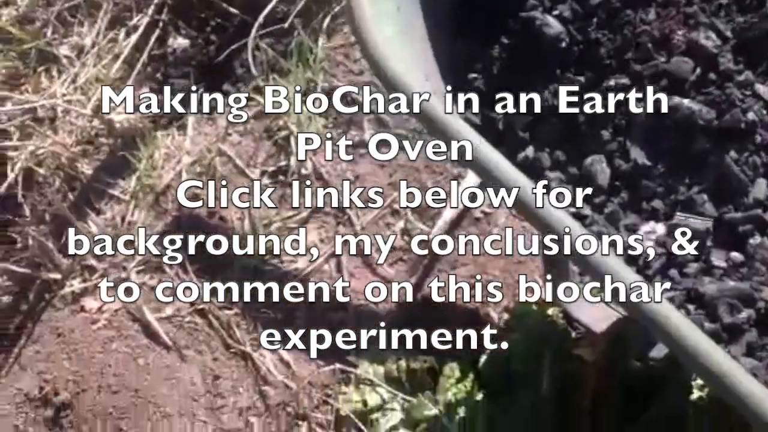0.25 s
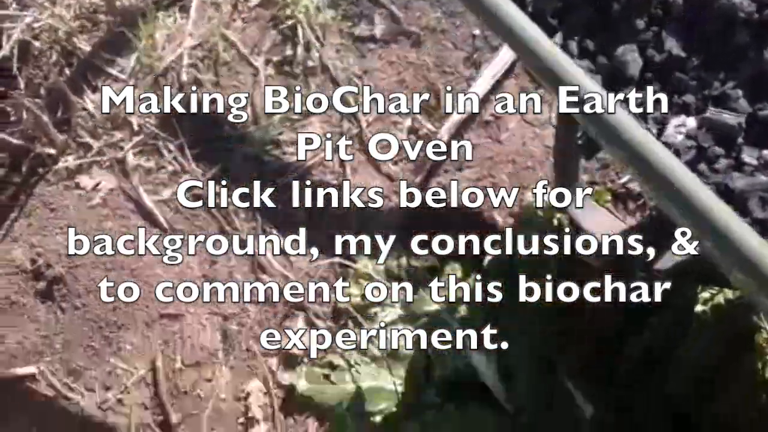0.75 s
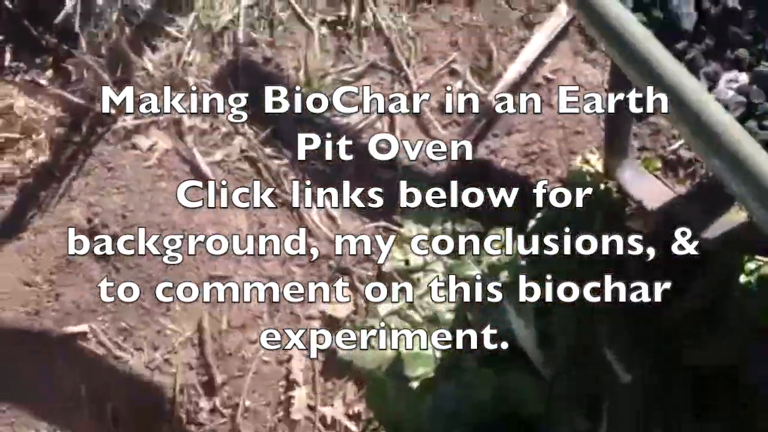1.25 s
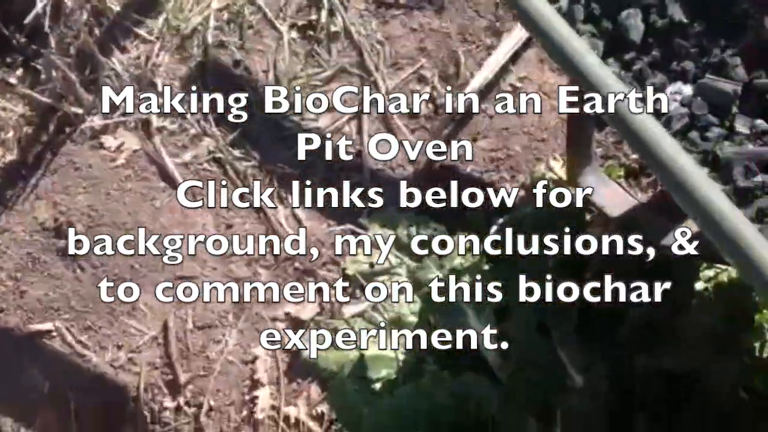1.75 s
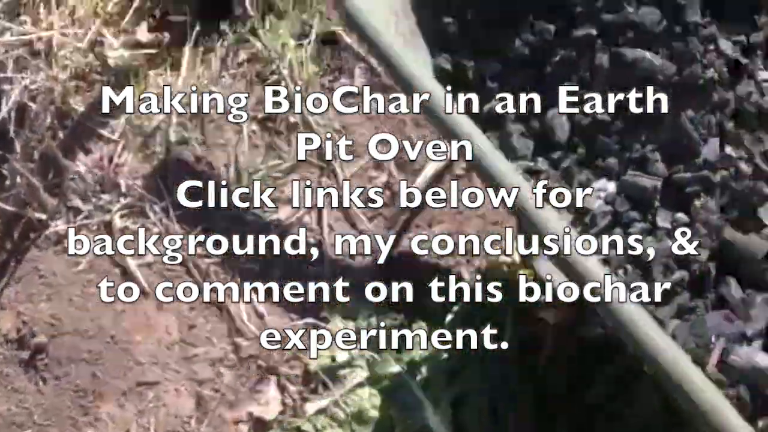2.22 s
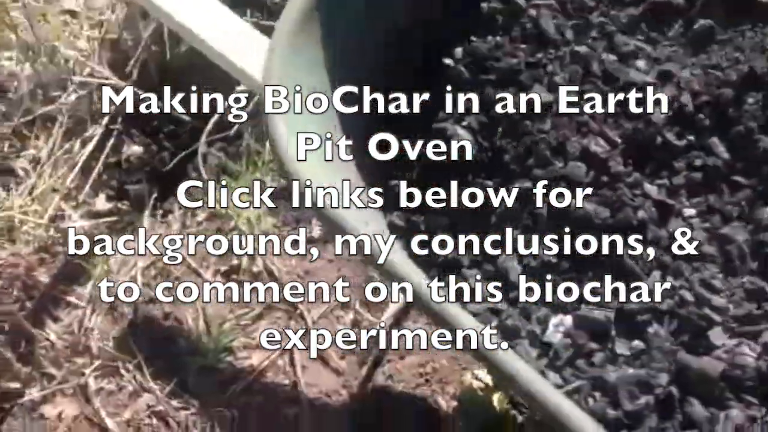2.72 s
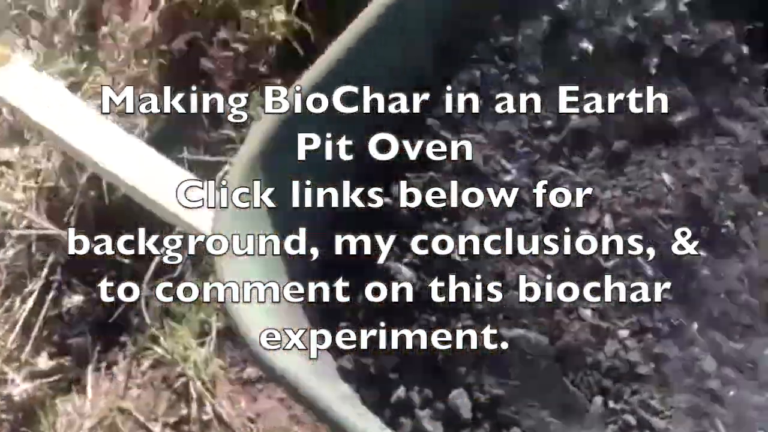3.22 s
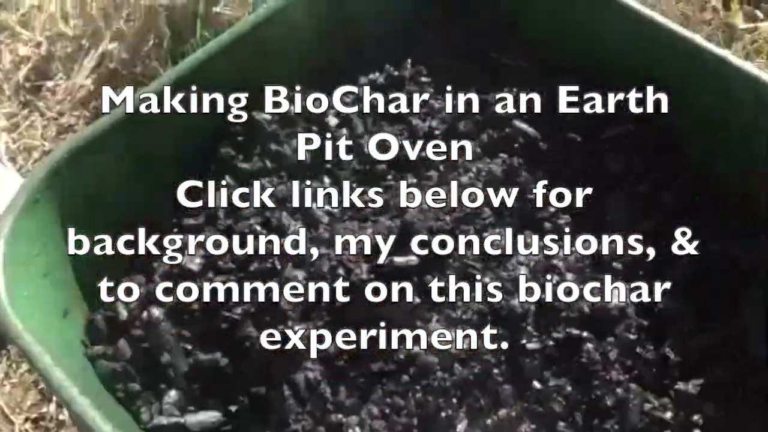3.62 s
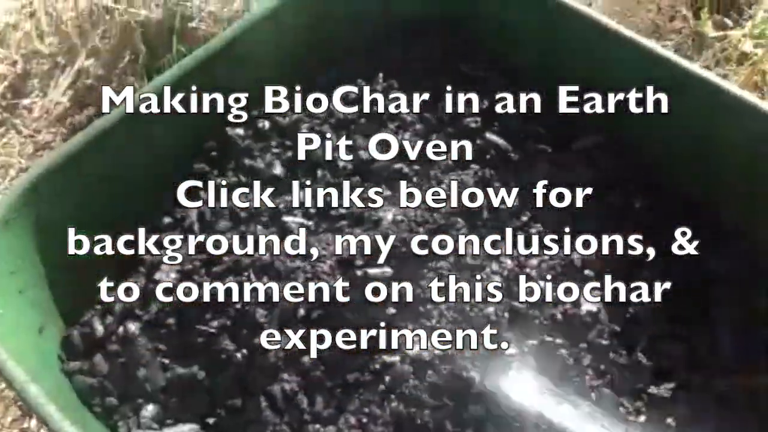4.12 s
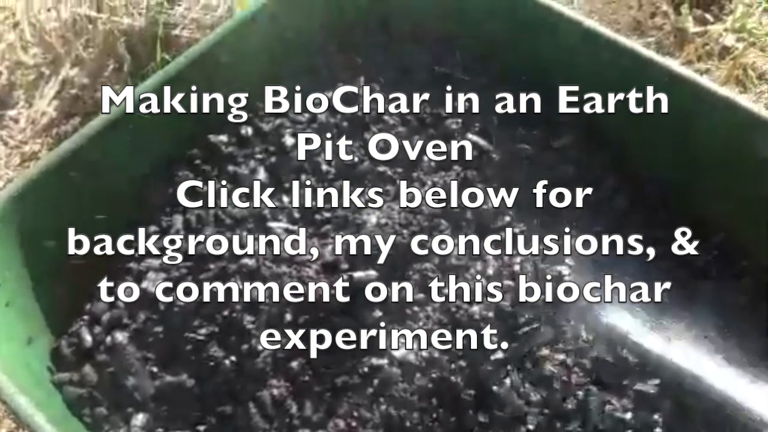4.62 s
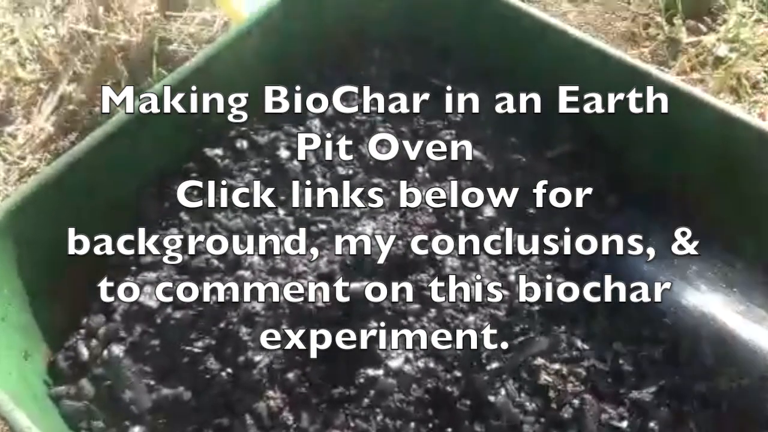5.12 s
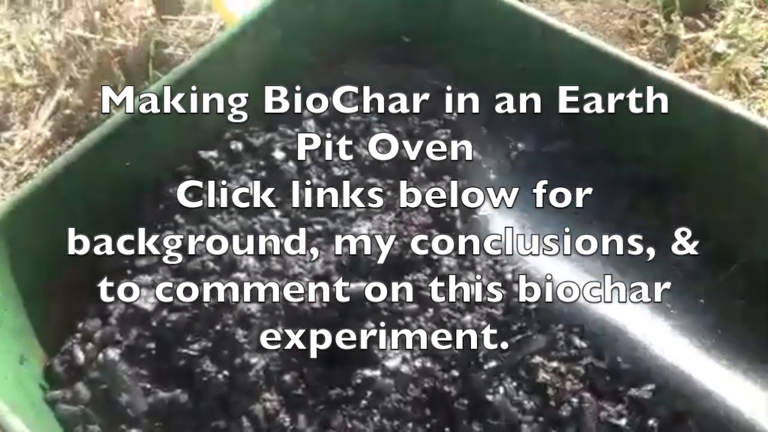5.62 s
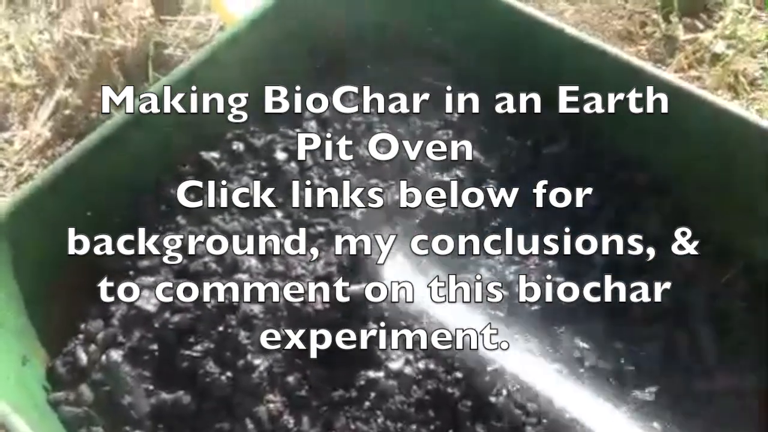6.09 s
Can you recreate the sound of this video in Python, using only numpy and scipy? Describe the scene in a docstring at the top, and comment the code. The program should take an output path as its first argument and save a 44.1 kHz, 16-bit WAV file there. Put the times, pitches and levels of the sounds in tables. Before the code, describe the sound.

After a quiet moment, a hose snaps on and hisses steadily, spattering soil and charcoal, with one sharp rattling rap and late wind thumps.

```python
"""Garden hose on a barrow of charcoal

A hose opens in a quiet yard; its jet swings over the soil and onto a wheelbarrow of charcoal.
The nozzle hisses (noise combed by sliding reflections); random drops splash on the lumps and drum on the tub.
Once the jet raps sharply across the barrow's rim, a volley of impacts through narrow resonances.
Puffs of wind, low noise and short pushes, nudge the microphone, more towards the end."""
import sys
import numpy as np
from scipy import signal
from scipy.fft import rfft, irfft
from scipy.io import wavfile
from scipy.ndimage import uniform_filter1d

SR = 44100
rng = np.random.default_rng(int(sys.argv[2]) if len(sys.argv) > 2 else 0)


def transcribe(signal):
    """Save signal, clipped to [-1, 1], as a 16-bit WAV file at the path in sys.argv[1]."""
    frames = np.atleast_2d(signal).T
    limited = np.clip(frames, -1, 1)
    pcm = np.round(limited * 32767).astype(np.int16)
    wavfile.write(sys.argv[1], SR, pcm)


N = 280123
TIME = np.arange(N) / SR  # s
HZ = np.fft.rfftfreq(N, 1 / SR)  # bins of the whole take
FRAMES = np.arange(N // 128 + 5) * 128 / SR  # s, short-time frames
BINS = np.fft.rfftfreq(512, 1 / SR)  # Hz, short-time bins


def gain_of(db):
    """Decibels to amplitude."""
    return 10 ** (np.asarray(db) / 20)


def evened(x):
    """Scales to an rms of one."""
    return x / np.sqrt(np.mean(x ** 2) + 1e-20)


def read(points, hz):
    """A spectrum in dB, joined on a log-frequency axis."""
    f, db = np.transpose(points)
    return np.interp(np.log(hz + 1), np.log(f + 1), db)


def follow(rows, t):
    """Every column of a curve table at the times t."""
    s, *columns = np.transpose(rows)
    return [np.interp(t, s, c) for c in columns]


def coloured(x, colour):
    """Filters x by a spectrum; rms one."""
    spectrum = rfft(x) * gain_of(read(colour, HZ))
    return evened(irfft(spectrum, N))


def flutter(rate):
    """Smooth random wandering, up to about rate changes a second; rms one."""
    spectrum = rfft(rng.standard_normal(N)) * np.exp(-(HZ / rate) ** 2)
    return evened(irfft(spectrum, N))


def impacts(per_s, spread_db):
    """Random drop impacts of either sign: many small, a few large."""
    size = gain_of(spread_db * np.minimum(rng.exponential(1, N), 4))
    sign = rng.choice([-1, 1], N)
    lands = rng.random(N) < per_s / SR
    return size * sign * lands


def bell(x, centre, width):
    """One at the centre, falling smoothly to either side."""
    return np.exp(-.5 * ((x - centre) / width) ** 2)


def swell(s, db, half):
    """A bell-shaped envelope in time."""
    return gain_of(db) * bell(TIME, s, half)


def swells(rows):
    """Overlapping bells, summed in power."""
    return np.sqrt(sum(swell(*row) ** 2 for row in rows))


def patches(frames, bins):
    """Random time-frequency patches of unit spread."""
    field = rng.standard_normal((len(FRAMES), len(BINS)))
    along_time = uniform_filter1d(field, round(frames), axis=0)
    return evened(uniform_filter1d(along_time, round(bins), axis=1))


def shaded(x, gains):
    """Filters x by gains that change from frame to frame."""
    z = signal.stft(x, nperseg=512, noverlap=384)[2]
    return signal.istft(z * gains[:z.shape[1]].T, nperseg=512, noverlap=384)[1][:N]


def yard():
    """Steady far-off outdoor murmur of air: noise under a fixed spectrum."""
    # murmur: (frequency [Hz], density [dB])
    yard_colour = [(20, -45), (45, -26), (85, -12.5), (130, -5.5), (200, -6), (290, -7), (420, -5.5),
                   (700, -7), (1000, -12.5), (1300, -17), (2100, -28), (4000, -31.5), (10000, -33.5),
                   (15000, -40)]
    return gain_of(-55.5) * coloured(rng.standard_normal(N), yard_colour)


def wind(lumpy_db=2.0, breeze_db=-1.5, buffet_db=1.0, low_cut_hz=58):
    """Eddies swell in gusts, brighter when strong, with short pushes; the microphone cuts the deepest part."""
    # gusts on the microphone, before breeze_db: (time [s], level [dB], bell half length [s])
    gusts = [(.4, -58, 0.071), (.95, -57, .17), (1.3, -56, .04), (3.75, -58, 0.16), (4.9, -54, 0.21),
             (5.33, -48.5, 0.086), (5.56, -40.5, 0.07), (5.97, -42, 0.13), (6.235, -30, 0.047)]
    # single buffets, before buffet_db: (time [s], level [dB])
    buffet_rows = [(.09, -50), (.196, -44.5), (.623, -44), (.712, -48.5), (.925, -50), (1.115, -47),
                   (4.79, -43.5), (4.971, -44), (5.31, -39.5), (5.505, -36), (5.63, -35), (5.7, -42),
                   (5.755, -45), (5.835, -36.5), (5.875, -35.5), (5.924, -33.5), (6.015, -33.5),
                   (6.053, -32.5), (6.147, -31.5), (6.199, -29)]
    # low rumble of the eddies: (frequency [Hz], density [dB])
    wind_colour = [(20, -44), (40, -24), (70, -18), (105, -2), (145, 0.5), (210, -0.5), (290, -9),
                   (400, -15), (700, -37), (2000, -68)]
    # higher roar of strong gusts: (frequency [Hz], density [dB])
    roar_colour = [(120, -37), (235, 3), (320, -4), (480, -19), (800, -36), (2000, -66)]
    calm_db = -74  # light air between the gusts, before breeze_db
    half_s, buffet_hz, spread_octaves = 0.0053, 174.6, .35  # each buffet is a push of about two swings
    roar_db, roar_from_db, roar_growth = -7.5, -31.5, 1.57  # share at that wind level; power of growth

    lumps_db = lumpy_db * flutter(27)
    breeze = np.hypot(gain_of(calm_db), swells(gusts)) * gain_of(breeze_db + lumps_db)
    pressure = breeze * coloured(rng.standard_normal(N), wind_colour)

    buffets = [swell(s, db + buffet_db, half_s) for s, db in buffet_rows]
    draws = rng.uniform(-1, 1, (len(buffets), 2))
    for push, (pitch, phase) in zip(buffets, draws):
        hz = buffet_hz * 2 ** (spread_octaves * pitch)
        pressure += push * np.sin(2 * np.pi * hz * TIME + np.pi * phase)

    force = np.hypot(breeze, sum(buffets)) / gain_of(roar_from_db)
    roar = gain_of(roar_from_db + roar_db) * force ** roar_growth
    pressure += roar * coloured(rng.standard_normal(N), roar_colour)
    low_cut = signal.butter(2, low_cut_hz, "high", fs=SR, output="sos")
    return signal.sosfilt(low_cut, pressure)


def rustle():
    """Soft bright scuffs and ticks of handling the hose: dense small impacts under short bells."""
    # faint rustles: (time [s], level [dB], bell half length [s])
    rustle_rows = [(.238, -69, .018), (.276, -61, .0008), (.57, -68.5, 0.087), (.61, -68, .001)]
    colour = [(500, -20), (1700, 2), (4000, 1), (8000, -1), (15000, -10)]  # (Hz, dB)
    return swells(rustle_rows) * coloured(impacts(6000, 3), colour)


def valve(rise=0.0017):
    """Zero until the valve snaps open, then one after a rise in seconds."""
    open_s = .711
    return np.clip((TIME - open_s) / rise + .5, 0, 1)


def landing():
    """Splash, drum and patter levels in dB: each holds on a spot and slides to the next."""
    # where the jet lands: ground (three rows), edge of the load, near the rim, then inside the tub;
    # (arrival [s], splash [dB], drumming of the surface [dB], patter on soil [dB]), before trims
    spots = np.array([ (.8, -49, -56, -71), (1.03, -47, -56.5, -78), (1.33, -48.5, -62, -61.5),
                      (2.25, -42.5, -54, -51), (3.04, -41, -48, -52), (3.35, -45.5, -49.5, -59.5),
                      (3.8, -44, -51, -59.5), (5.15, -43.5, -51, -54), ])
    swing_s = 0.09  # slide from one spot to the next
    first_spray_db = -12  # the first thin spray, against the first spot
    before = spots[0, 1:] + first_spray_db
    steps = np.diff(np.vstack([before, spots[:, 1:]]), axis=0)
    arrived = np.clip((TIME - spots[:, :1]) / swing_s + .5, 0, 1)
    return before[:, None] + steps.T @ arrived


def soil():
    """Dull patter of heavy drops on earth: random impacts under a low spectrum."""
    # thud of wet earth: (frequency [Hz], density [dB])
    soil_colour = [(50, -55), (95, -28), (150, -0.5), (230, 0.5), (330, -1.5), (470, -2), (700, -9.5),
                   (1400, -27), (4000, -53)]
    return gain_of(landing()[2]) * coloured(impacts(900, 1.64), soil_colour)


def splats():
    """Short slaps, thuds and whistles in the spray: bursts of noise, each gathered around one pitch."""
    # bursts: (time [s], level [dB], centre [Hz], width [octaves], bell half length [s])
    splat_rows = [(2.272, -44, 440, 0.7, 0.0075), (2.269, -38.5, 1540, 0.53, .002),
                  (2.878, -39, 383, 0.97, 0.006), (2.878, -40, 1000, 0.8, 0.0024),
                  (3.83, -51, 78, 0.3, 0.016), (3.94, -49.5, 930, 0.49, 0.11),
                  (4.508, -40.5, 1560, 0.25, 0.029), (5.0, -46, 9100, .04, 0.066),
                  (5.24, -48.5, 1320, 0.22, 0.073), (5.452, -42, 2400, 1, 0.064),
                  (5.904, -49.5, 900, 0.16, 0.026)]
    out = np.zeros(N)
    for s, db, centre_hz, octaves, half in splat_rows:
        hollow = bell(np.log2((HZ + 1) / centre_hz), 0, octaves)
        burst = irfft(rfft(rng.standard_normal(N)) * hollow, N)
        out += swell(s, db, half) * evened(burst)
    return out


def rap(trim_db=1.1):
    """A tight volley of hard impacts of the jet that set the rim ringing briefly."""
    # raps over the rim, before ringing and trim: (time [s], level [dB], bell half length [s])
    rap_rows = [(3.289, -17.5, 0.0031), (3.2928, -19, 0.001), (3.3072, -17.5, 0.0036),
                (3.3135, -19.5, 0.0022), (3.326, -20, 0.004), (3.333, -25.5, 0.0033), (3.314, -25, 0.019)]
    # bare impacts: (frequency [Hz], density [dB])
    rap_colour = [(60, -36.5), (130, -10), (260, -13), (400, -11), (700, -3), (1300, -5), (1900, -4.5),
                  (3500, -2.5), (4900, -4), (5800, 0.5), (7300, 1), (9000, -2), (12000, -8), (15000, -10)]
    # resonances of the rim, before levelling: (frequency [Hz], width [Hz], gain over the bare impacts [dB])
    rim = [(1900, 130, 2.5), (2500, 110, 1), (4670, 75, -6), (5160, 97, 2), (5770, 170, 5), (6140, 70, 6),
           (6400, 110, -3), (6830, 110, 2), (7380, 150, 3), (8100, 51, 8), (8750, 100, 3), (10600, 200, -2)]
    volley = swells(rap_rows) * coloured(impacts(16000, 1.0), rap_colour)
    ring = 1 + sum(gain_of(db) / (1 + 2j * (HZ - f) / width) for f, width, db in rim)
    ringing = evened(irfft(rfft(volley) * ring, N))
    return gain_of(trim_db) * volley.std() * ringing  # back to the level of the volley, then trimmed


def splash(splash_trim_db=-1.0, tub_trim_db=-1.0, ticks_db=-12, flutter_db=0.1, hollows_db=2.0):
    """Dense drops splash on the lumps and drum on what lies beneath; sparser, more varied ones tick."""
    # wet splash on the lumps: (frequency [Hz], density [dB])
    splash_colour = [(500, -40), (1100, -7), (1700, -2), (2600, -0.5), (3600, -3.5), (4800, -7),
                     (7000, -14), (15000, -39)]
    # hollow drumming: (frequency [Hz], density [dB])
    tub_colour = [(200, -26), (450, -14), (700, -2), (900, -0.5), (1200, -5.5), (1700, -5.5), (3500, -45)]
    tick_colour = [(400, -25.5), (1500, -9), (5000, 7), (9000, 1), (15000, -4)]  # (Hz, dB)
    sway_db = -0.02 * flutter(6.6)  # the hand is never quite still
    splash_db, drum_db = landing()[:2] + sway_db
    surge_db = flutter_db * flutter(37)  # the jet breaks up unevenly
    wet = gain_of(splash_db + splash_trim_db) * coloured(impacts(7000, 2.85), splash_colour)
    drum = gain_of(drum_db + tub_trim_db) * coloured(impacts(3000, 2.7), tub_colour)
    ticks = gain_of(splash_db + ticks_db) * coloured(impacts(450, 5.4), tick_colour)
    hollows = gain_of(hollows_db * patches(10, 2))  # wet gaps between the lumps colour it in brief patches
    return (shaded(wet + drum, hollows) + ticks) * gain_of(surge_db)


def hiss(band_octaves=0.31, patchy_db=2.5, mist_rest_db=-9, trim_db=-0.1):
    """Jet turbulence: noise with a wandering bright band and surges, combed by reflections that slide."""
    # steady hiss of the spray, 4.5 to 10 kHz, before surges and trim: (time [s], level [dB])
    hiss_level = [(.72, -44), (1.0, -38.5), (1.6, -39.5), (2.05, -39.5), (2.3, -41), (3.05, -40.5),
                  (3.24, -36), (3.4, -42.5), (4.2, -41.5), (4.5, -39.5), (5.1, -39.5), (5.3, -40.3),
                  (6.35, -39)]
    # hiss at rest: (frequency [Hz], density [dB])
    hiss_colour = [(1000, -39), (2200, -9), (3500, -3), (4700, -2), (5800, 0.5), (7000, -0.5), (8500, -2),
                   (10500, -5.5), (12500, -8.5), (15000, -11.5)]
    # bright band as the nozzle turns: (time [s], height [dB], centre [Hz])
    bright = [(.72, 1.5, 6600), (.95, 4.5, 7600), (1.15, -3, 7050), (1.3, 3.5, 7600), (2.1, 5.5, 7700),
              (2.3, -4, 7000), (2.7, 2, 7200), (3.2, -1.5, 6200), (3.5, 4.5, 4300), (4.1, 3, 4140),
              (4.6, -1, 6500)]
    # fine mist in the top treble, before the lift of the bright band: (time [s], level [dB])
    mist_level = [(.72, -54.5), (1.0, -47.5), (1.4, -48), (2.5, -49.5), (2.72, -44), (3.02, -49),
                  (3.22, -44.5), (3.4, -51), (4.4, -47.5), (5.05, -46), (5.55, -47.5), (6.35, -44)]
    # extra travel time of the reflections as the hand moves: (time [s], delay [ms])
    path = [(0.72, 0.834), (0.95, 0.78), (1.2, 0.73), (1.35, 0.878), (1.48, 1.031), (1.62, 1.005),
            (1.8, 0.897), (2.03, 0.81), (2.2, 0.909), (2.5, 0.95), (2.85, 1.155)]
    # reflections, before their strength: (delay [multiples of the travel time], gain [amplitude ratio])
    reflections = [(.97, -0.11), (1.19, -.34), (1.35, -.11), (1.46, -0.0045)]
    # surges as the jet catches an edge:
    # (time [s], bell half length [s], boost [dB], centre [Hz], width [octaves])
    surges = [(.75, 0.045, 3, 6600, .04), (1.095, 0.038, 1, 4280, 0.44), (1.213, 0.023, 7, 5070, 0.11),
              (1.284, 0.036, 3.5, 8800, 0.13), (1.57, 0.071, 4.5, 7750, .08), (1.927, .04, 4.5, 8400, .2),
              (2.18, 0.028, 4.5, 7600, 0.32), (2.733, 0.095, 4, 7500, 0.29),
              (3.643, 0.023, 4.5, 5770, 0.55)]
    # reflections are strongest with the nozzle close beside the barrow, and fade as it moves off
    close_s, close_half_s, far_strength, close_extra = 1.5, 0.37, 0.048, 0.82

    t, octave = FRAMES[:, None], np.log2(BINS + 1)
    level_db = follow(hiss_level, t)[0]
    band_db, centre_hz = follow(bright, t)
    band = band_db * bell(octave, np.log2(centre_hz), band_octaves)
    mist_db = follow(mist_level, t)[0] - level_db - mist_rest_db + band_db / 2
    mist = mist_db * np.clip((BINS - 8000) / 3500, 0, 1)

    strength = far_strength + close_extra * bell(t, close_s, close_half_s)
    turns = BINS * follow(path, t)[0] / 1000  # cycles of delay
    echoes = sum(g * np.exp(-2j * np.pi * turns * k) for k, g in reflections)
    comb = 1 + strength * echoes

    shape_db = read(hiss_colour, BINS) + band + mist + patchy_db * patches(23, 2)
    shape = abs(comb) * gain_of(shape_db)
    core = (BINS > 4500) & (BINS < 10000)  # each frame is levelled over this band
    shape /= np.sqrt(np.mean((shape * core) ** 2, axis=1, keepdims=True))
    surge_db = sum(db * bell(t, s, half) * bell(octave, np.log2(hz), width)
                   for s, half, db, hz, width in surges)
    return shaded(rng.standard_normal(N), shape * gain_of(level_db + surge_db + trim_db))


def scene():
    """All sources reach one microphone, heard alike in both channels."""
    background = yard() + wind() + rustle()
    spray = valve() * (soil() + splash() + hiss())
    mono = background + splats() + rap() + spray
    return np.array([mono, mono])


def record(dry):
    """The recorder's steep band limit: a long low-pass at 15.03 kHz."""
    low_pass = signal.firwin(701, 15030, window=("kaiser", 9), fs=SR)
    return signal.oaconvolve(dry, low_pass[None], "same")


dry = scene()
out = record(dry)
transcribe(out)
```